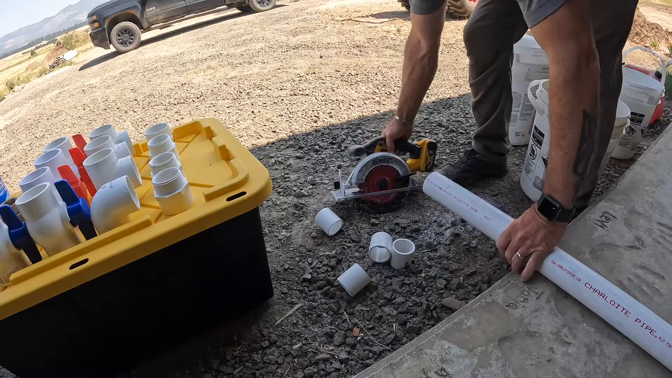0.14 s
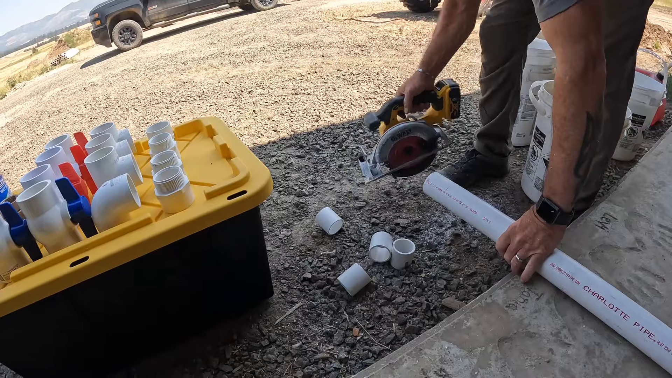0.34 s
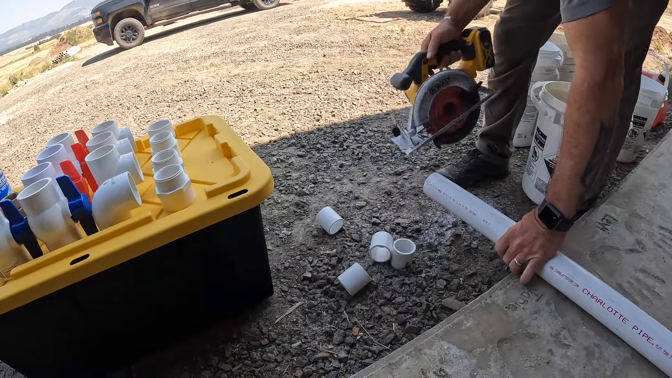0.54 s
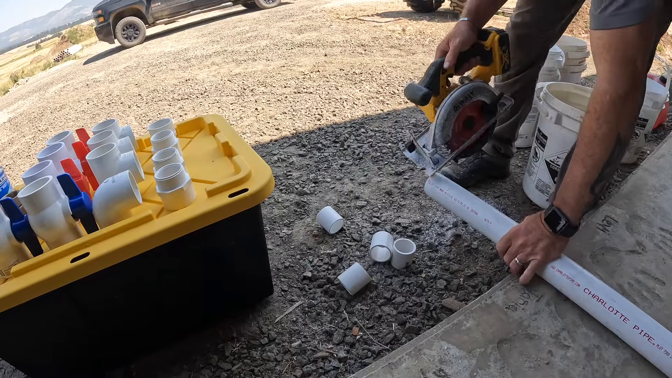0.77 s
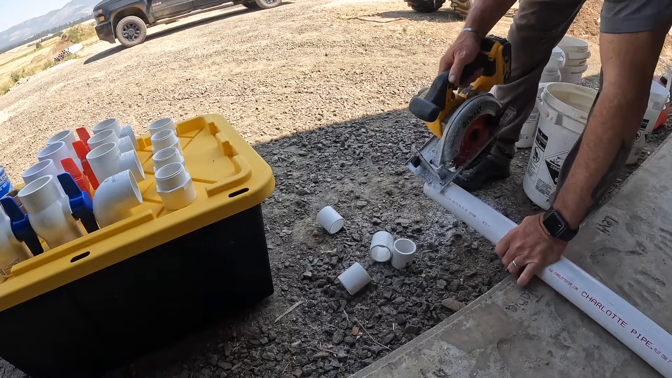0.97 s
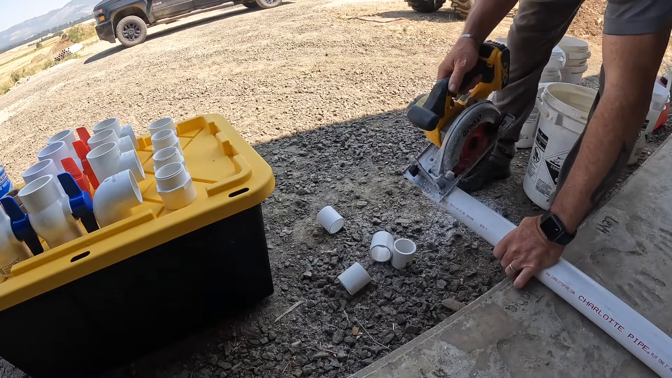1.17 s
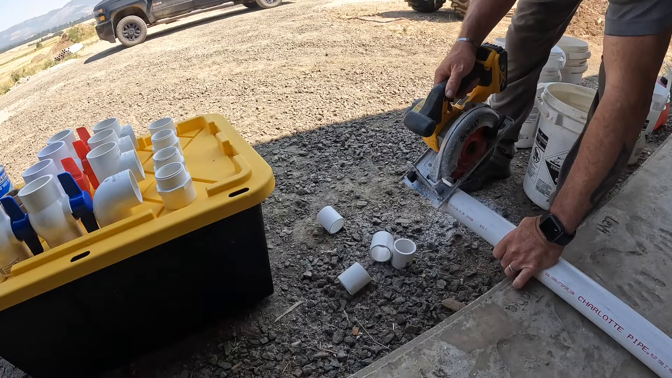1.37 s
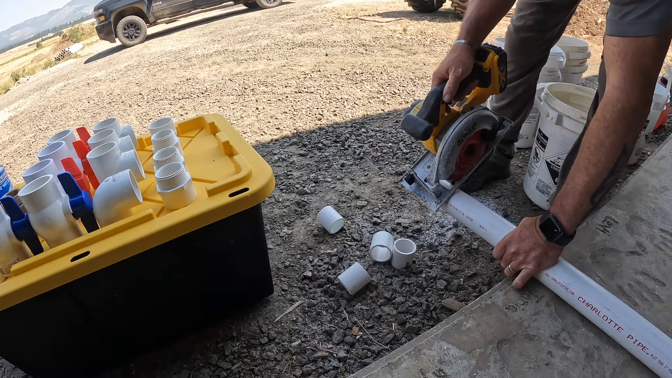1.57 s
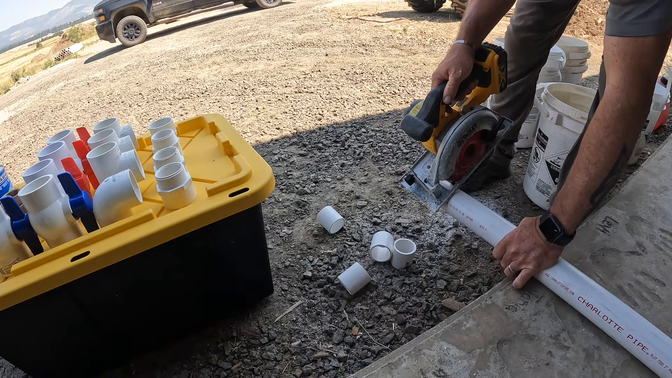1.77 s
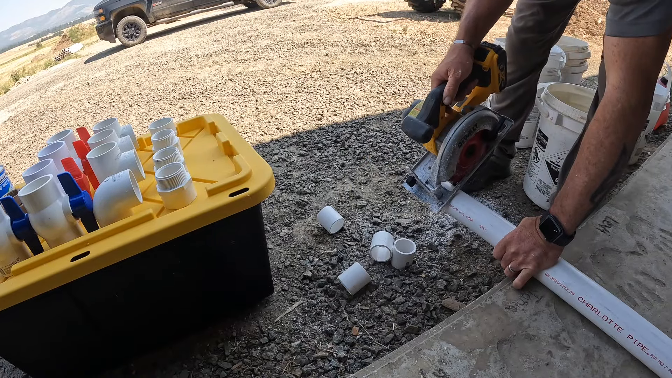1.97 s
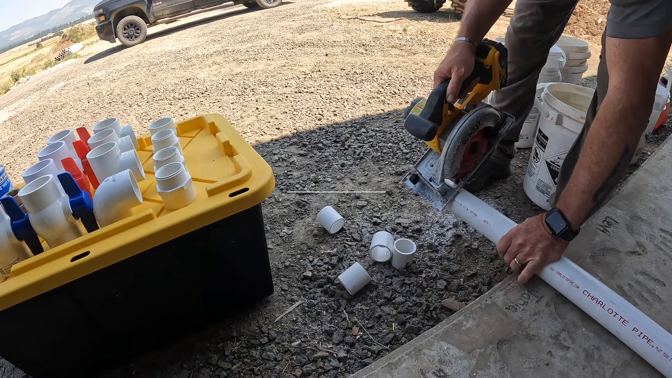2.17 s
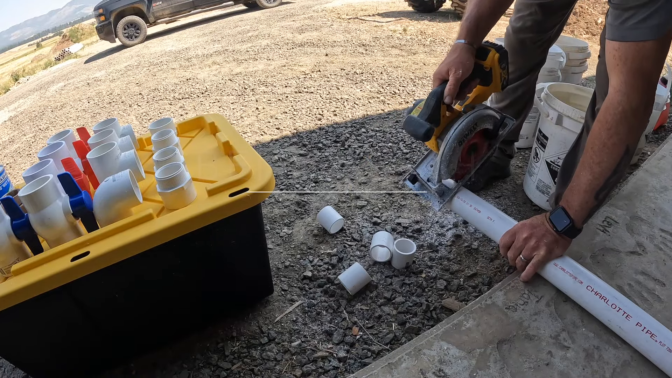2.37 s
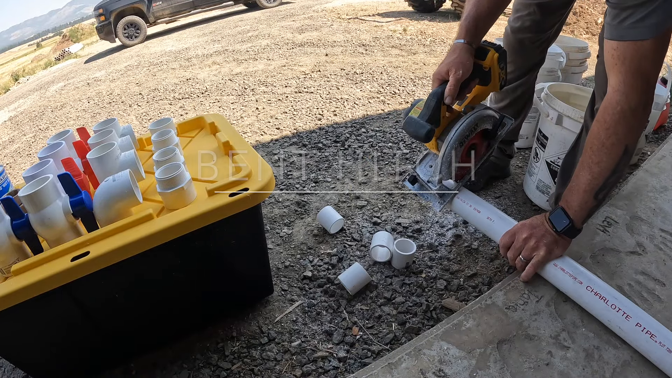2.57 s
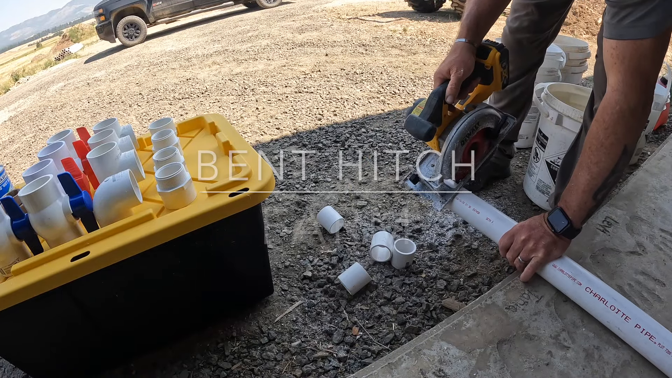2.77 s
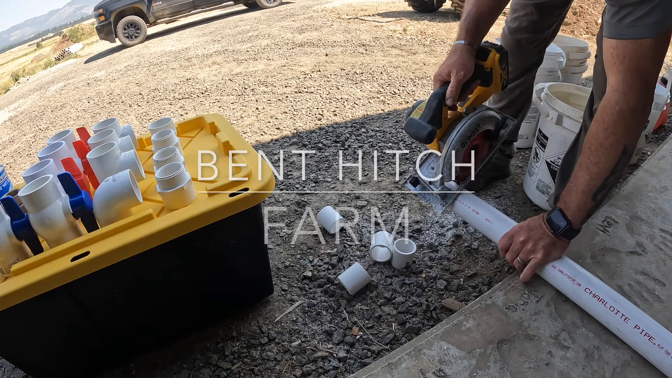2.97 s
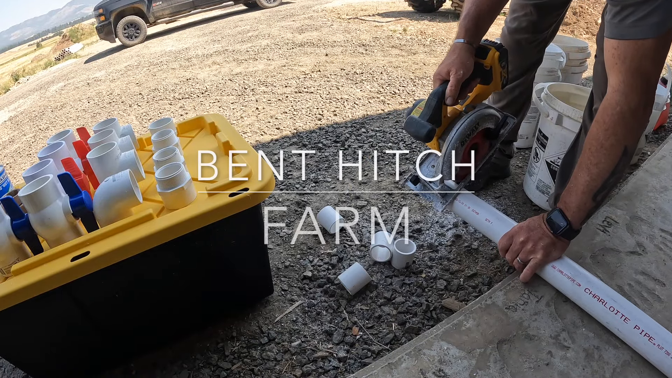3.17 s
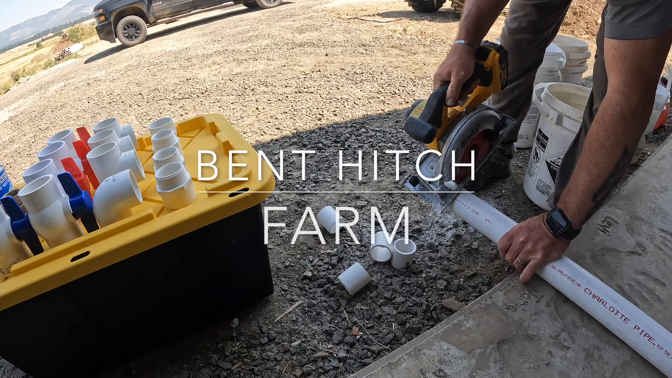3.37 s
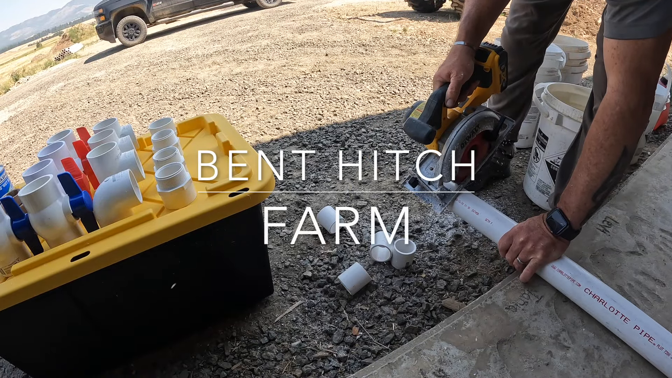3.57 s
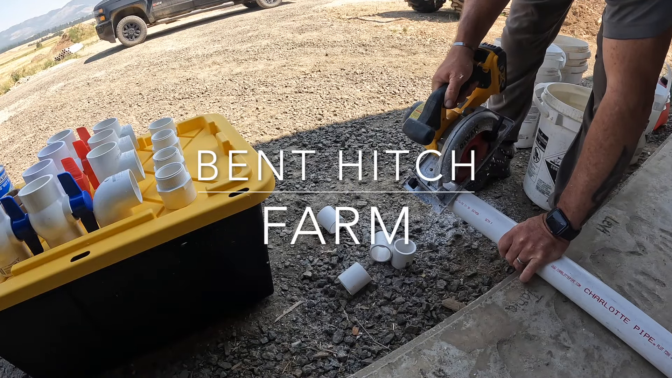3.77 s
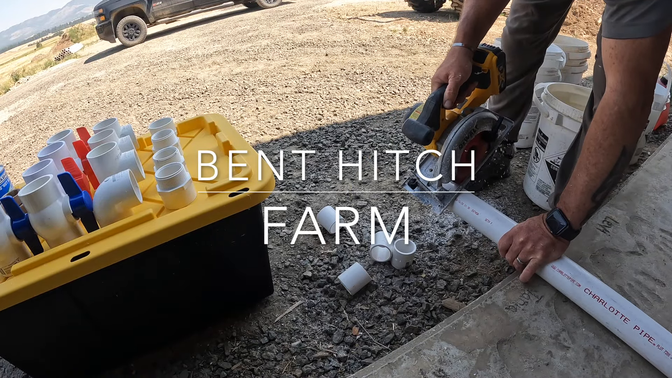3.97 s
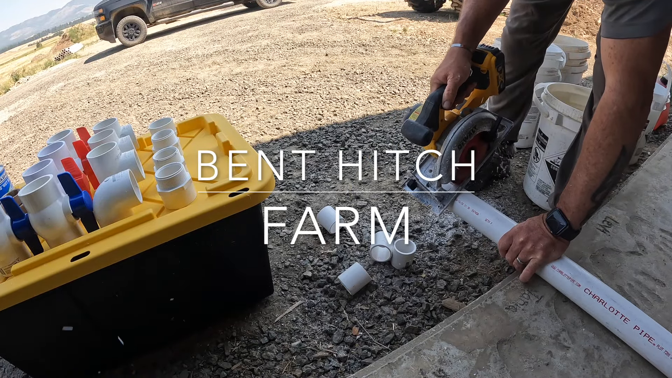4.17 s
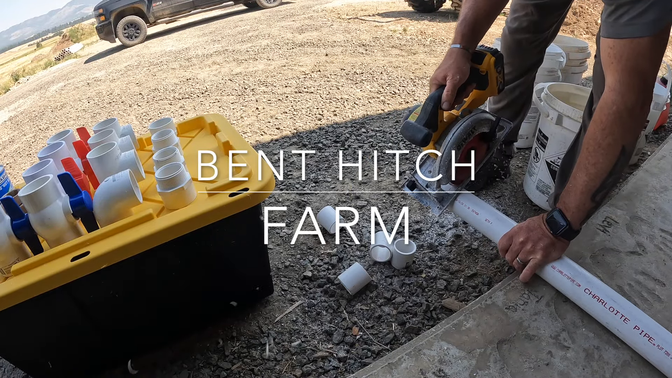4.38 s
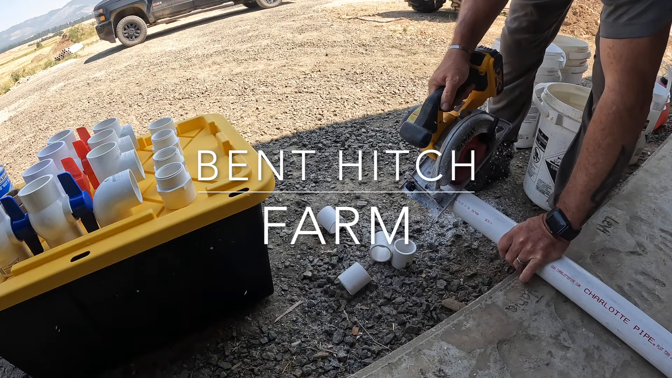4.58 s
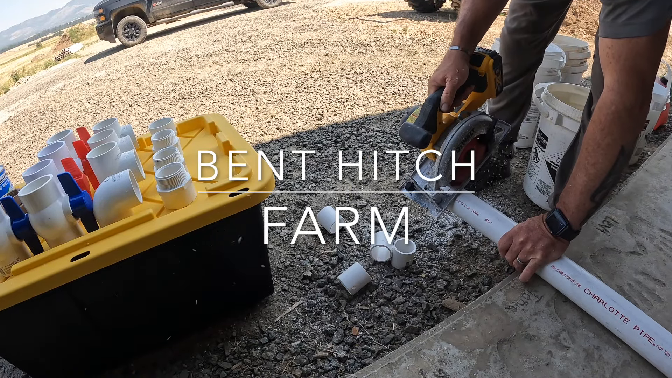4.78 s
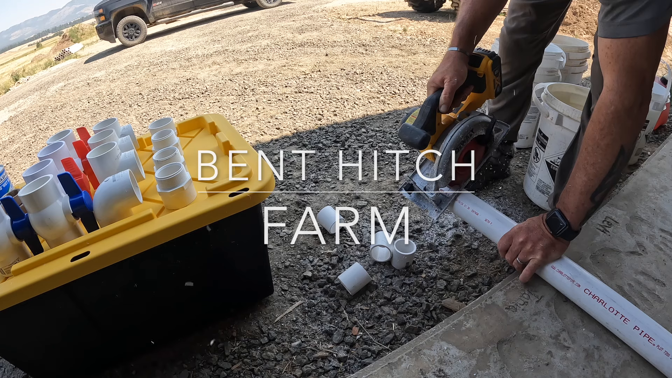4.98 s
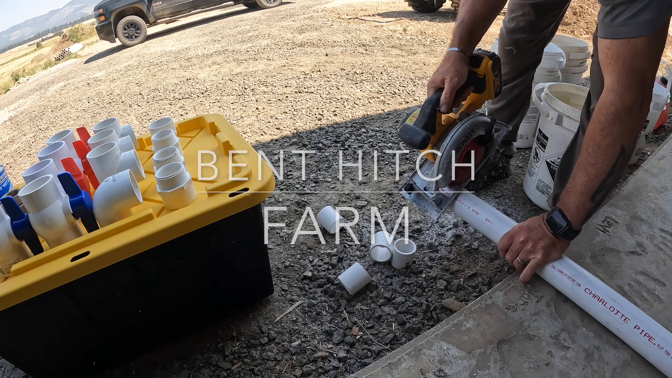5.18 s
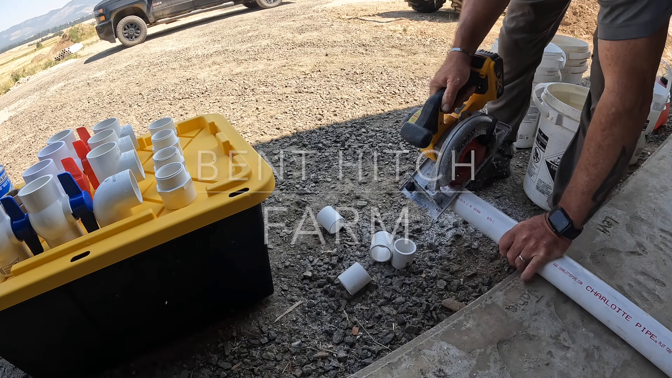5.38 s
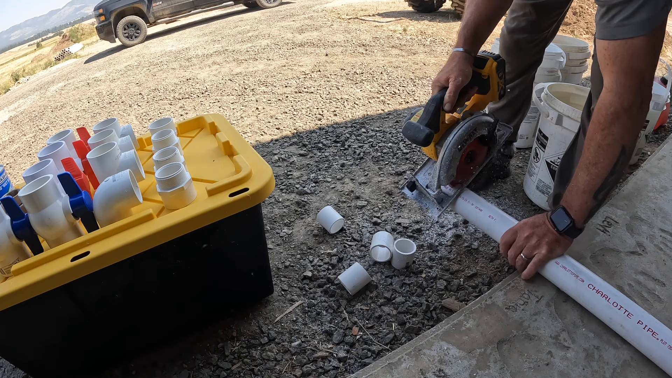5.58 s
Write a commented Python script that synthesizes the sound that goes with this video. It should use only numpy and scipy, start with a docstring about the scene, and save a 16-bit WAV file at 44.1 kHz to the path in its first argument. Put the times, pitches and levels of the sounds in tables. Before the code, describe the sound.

In a quiet yard, a cordless circular saw is lifted off gravel with scrapes, knocks and small crunches of stone. Its base plate clacks onto a plastic pipe and shifts with faint taps. The trigger clicks sharply and the motor whirs up with a gear whine. The blade then bites into the pipe, a loud, steady rasp with wavering metallic squeals. The sound is close, with only a slight echo.

```python
"""Outdoors in a quiet yard, a cordless circular saw is lifted off gravel and set on a plastic pipe.
Its base plate scrapes and knocks, stones crunch, and the latch and trigger click.
The motor runs up: the fan rushes, the rotor hums, the gears whine and the free blade rings.
Then the teeth chip at the pipe, the speed sags a little, and rubbing makes the steel blade sing."""
import sys
import numpy as np
from scipy import signal
from scipy.fft import rfft, irfft, next_fast_len
from scipy.io import wavfile
from scipy.ndimage import uniform_filter1d, map_coordinates

SR = 44100
rng = np.random.default_rng(int(sys.argv[2]) if len(sys.argv) > 2 else 0)


def unload_wav(signal):
    """Save mono or channel-first audio to the path in sys.argv[1] as 16-bit WAV at rate SR, clipped to [-1, 1]."""
    wavfile.write(
        sys.argv[1],
        SR,
        np.round(np.clip(np.atleast_2d(signal).T, -1, 1) * 32767).astype(np.int16),
    )


N = 248724
T = np.arange(N) / SR
START_S, TOUCH_S, SINK_S = 3.112, 3.685, 4.1  # motor starts, teeth touch the pipe, blade sinks in
TOUCH_RISE_S = 0.035
BLADE_TEETH, TEETH_PER_ROTOR_TURN = 28, 5.5


def amp(db):
    """Turns decibels into a gain."""
    return 10 ** (np.asarray(db) / 20)


def unit(x):
    """Scales a signal to an average (rms) size of 1."""
    return x / np.sqrt(np.mean(x ** 2) + 1e-20)


def at_level(x, db, window=176):
    """Scales a short sound so that its loudest stretch of `window` samples has this level."""
    return amp(db) * x / np.sqrt(uniform_filter1d(x ** 2, size=window).max())


def curve(rows):
    """Joins (time, value) points with straight lines."""
    return np.interp(T, *np.transpose(rows))


def ramp(start_s, length_s):
    """Rises evenly from 0 to 1."""
    return np.clip((T - start_s) / length_s, 0, 1)


def at_pitch(points, hz):
    """Looks up a (frequency, value) table, sliding between its rows."""
    f, value = np.transpose(points)
    return np.interp(np.log(hz + 1), np.log(f + 1), value)


def colour(x, points):
    """Turns each frequency up or down as a table says."""
    size = next_fast_len(len(x) + 4096)
    gain = amp(at_pitch(points, np.fft.rfftfreq(size, 1 / SR)))
    return irfft(rfft(x, size) * gain, size)[:len(x)]


def keep_side(x, hz, kind):
    """Keeps the "low" or the "high" side of a frequency."""
    return signal.sosfilt(signal.butter(2, hz, kind, fs=SR, output="sos"), x)


def band(x, hz, width_hz):
    """Keeps a band around one frequency."""
    return signal.lfilter(*signal.iirpeak(hz, hz / width_hz, SR), x)


def lift_treble(x, hz, db):
    """Turns everything above hz up by db (down, if negative)."""
    treble = keep_side(keep_side(x, hz, "high")[::-1], hz, "high")[::-1]
    return x + (amp(db) - 1) * treble


def wander(hz):
    """A smooth random wobble of size 1, changing up to about hz times a second."""
    size, step = 8192, 32
    f = np.fft.rfftfreq(size, step / SR)
    slow = irfft(rfft(rng.standard_normal(size)) / (1 + (f / hz) ** 4), size)
    return unit(np.interp(T, np.arange(size) * step / SR, slow))


def resonate(x, hz, width_hz):
    """Makes x ring at a pitch, which may move."""
    spin = np.exp(2j * np.pi * np.cumsum(hz * np.ones(N)) / SR)
    decay = np.exp(-np.pi * width_hz / SR)
    return unit((spin * signal.lfilter([1], [1, -2 * decay, decay ** 2], x / spin)).real)


def grains(per_s, spread_db):
    """Random clicks of uneven size."""
    size = amp(spread_db * np.minimum(rng.exponential(1, N), 4))
    return unit(size * rng.choice([-1, 1], N) * (rng.random(N) < per_s / SR))


def ping(t, hz, db, fade_s):
    """A tone that dies away by 60 dB in fade_s."""
    return amp(db - 60 * t / fade_s) * np.sin(2 * np.pi * hz * t)


def add(mix, start_s, sound):
    """Mixes a sound in at a given time."""
    part = mix[round(start_s * SR):][:len(sound)]
    part += sound[:len(part)]


# tone of the outdoor air (frequency [Hz], level [dB])
AIR_TONE = [(30, -33), (80, -36), (120, -15.5), (180, -5), (310, -2), (450, -6.5), (800, -15), (1400, -10),
            (4000, -24), (8300, -37.5), (14300, -40)]
def outdoor_air():
    """A faint, low hush that drifts a little in level."""
    return amp(-67.5) * unit(colour(rng.standard_normal(N), AIR_TONE)) * amp(0.43 * wander(1.1))


# how long the echo lasts under the eaves (frequency [Hz], time to fade 60 dB [s])
ECHO_FADE = [(200, 0.49), (1200, 0.47), (5000, 0.49), (8000, 0.47), (12000, 0.2)]
def yard_echo(x):
    """The wall and things standing about send back a thin tail of sound."""
    hz, t, noise = signal.stft(rng.standard_normal(SR // 2), SR, nperseg=256)
    fading = noise * amp(-60 * t / at_pitch(ECHO_FADE, hz)[:, None]) * np.minimum(t / 0.01, 1)
    tail = signal.istft(fading, SR, nperseg=256)[1]
    return amp(-11.5) * signal.fftconvolve(x, tail / np.linalg.norm(tail))[:N]


# pitches the saw's case and blade guard favour (pitch [Hz], width [Hz], level [dB])
CASE_RINGS = [(816, 76, 1.5), (1303, 71, -4.5), (1570, 180, -6.5), (2175, 120, -6), (2343, 65, -5.5),
              (2576, 57, -7), (3110, 230, -0.5), (3440, 100, -6), (4180, 170, -2.5), (4610, 110, -7.5)]
def saw_case(x):
    """Case and guard ring along with whatever shakes them."""
    return sum(amp(db) * band(x, hz, width) for hz, width, db in CASE_RINGS)


# tone of the saw rubbing or hitting something (frequency [Hz], level [dB])
CONTACT_TONE = [(50, -40), (110, -34), (180, -8.5), (400, -4), (650, -2.5), (1400, -2), (3000, -7),
                (5400, -17), (8500, -38), (11000, -42.5), (14300, -59)]
# slides of the base plate (start [s], length [s], level [dB], hiss compared with that level [dB])
PLATE_SLIDES = [(0, 0.008, -47, -4), (0.054, 0.012, -38, -5), (0.193, 0.063, -44.5, -6),
                (0.402, 0.047, -53, -4.5), (0.487, 0.12, -58, -7.5), (0.883, 0.05, -50.5, -8),
                (0.997, 0.015, -53, -1), (1.647, 0.019, -62.5, 0), (1.938, 0.053, -52.5, -7.5),
                (2.102, 0.28, -63.5, -2), (2.623, .14, -65, -6.5), (2.822, 0.065, -59.5, -2.5),
                (3.037, .03, -59.5, -3)]
def scraping():
    """The base plate drags over gravel and pipe; the grip rustles less as the saw is steadied."""
    stones = 0.5 * rng.standard_normal(N) + grains(per_s=700, spread_db=1.0)
    grit = colour(stones + 0.41 * saw_case(stones), CONTACT_TONE) * amp(1.5 * wander(35))
    grip = amp(-59 - 9.5 * T)
    scrape, hiss = grip, amp(-5.5) * grip
    rise_s, fall_s = 0.017, 0.031
    for start, length, db, hiss_db in PLATE_SLIDES:
        before, after = np.maximum(start - T, 0), np.maximum(T - start - length, 0)
        push = amp(db) * np.exp(-before / rise_s - after / fall_s)
        scrape, hiss = np.maximum(scrape, push), np.maximum(hiss, amp(hiss_db) * push)
    return scrape * unit(keep_side(grit, 2130, "low")) + hiss * unit(keep_side(grit, 3800, "high"))


# notes of the struck saw body (pitch [Hz], level [dB], time to fade 60 dB [s])
BODY_NOTES = [(334, -9, 0.087), (566, -3.5, 0.079), (1056, 1.5, 0.054), (1203, -3.5, 0.068),
              (1416, -8, 0.078), (1857, -8.5, 0.094), (3350, -21, 0.042)]
# knocks of plate, guard, stones and trigger
# (time [s], level [dB], ring pitch [Hz], bass lift [dB], treble lift [dB])
HARD_KNOCKS = [(0.009, -37.5, 1265, -13, -5), (0.063, -33.5, 1415, 4.5, -2), (0.093, -35.5, 835, 6, 3),
               (0.129, -42, 1320, 5, -1), (0.18, -32.5, 690, -2, -2), (0.197, -35.5, 660, 0, 1),
               (0.221, -28, 1400, 0, -7), (0.449, -46, 850, 5, -12), (0.499, -44.5, 1810, -3, -14),
               (0.694, -43.5, 1150, -22, -17), (0.831, -46.5, 593, 4, -4), (0.863, -43, 1310, 5, -2),
               (0.886, -45.5, 845, 7, -12), (0.906, -43, 560, 9, -11), (0.974, -35.2, 1717, -2, 2),
               (0.995, -36, 900, -3, 7), (1.023, -41.5, 1017, -5, 1), (1.575, -45, 1460, 10.5, 0),
               (1.636, -52, 1410, -4, 9), (1.964, -49, 870, 10, -4), (1.995, -43.5, 1670, 9, 4),
               (2.174, -47.5, 600, 1, 9), (2.341, -41, 1413, 12, -10), (2.747, -53, 2350, -8, 24),
               (2.793, -52.5, 600, 3, -6), (3.013, -49.5, 1835, -10, 2), (3.056, -51, 1830, -7, 1),
               (3.083, -25.5, 1240, -16, 11), (3.115, -30, 1307, -11, 4)]
def knocks():
    """Each knock is a clack, a dull rattle and the ringing of the struck part and the saw body."""
    t = np.arange(SR // 4) / SR
    out = np.zeros(N)
    for start, db, ring_hz, bass_db, treble_db in HARD_KNOCKS:
        clack = colour(rng.standard_normal(len(t)) * np.exp(-t / 0.0024), CONTACT_TONE)
        clack = lift_treble(unit(clack), 3000, treble_db)
        clack = lift_treble(clack, 6000, np.clip(treble_db, -4, 9))
        rattle = colour(rng.standard_normal(len(t)) * amp(-60 * t / 0.085), CONTACT_TONE)
        rattle = lift_treble(unit(rattle), 2300, treble_db / 2 - 5)
        ring = ping(t, ring_hz, db=0, fade_s=0.032)
        body = sum(rng.choice([-1, 1]) * ping(t, *note) for note in BODY_NOTES)
        blow = clack + amp(-3.5) * rattle + amp(-0.9) * unit(ring) + amp(-6) * unit(body)
        rise_s = np.interp(treble_db, [-15, 0, 10], [0.006, 0.004, 0.002])  # dull knocks build slower
        blow = lift_treble(blow, 690, -bass_db) * np.minimum(t / rise_s, 1) ** 1.3
        add(out, start, at_level(blow, db))
    return out


# notes of the hollow guard (pitch [Hz], level [dB], time to fade 60 dB [s])
GUARD_NOTES = [(188, -23, 0.072), (676, 2.5, 0.031), (820, -5, 0.037)]
# bumps as the saw leaves the ground (time [s], peak [dB])
GUARD_BUMPS = [(0.178, -20.5), (0.202, -34)]
def guard_bumps():
    """Soft blows set the hollow guard ringing."""
    t = np.arange(SR // 5) / SR
    ring = sum(ping(t, *note) for note in GUARD_NOTES) * np.minimum(t / 0.0069, 1) ** 1.7
    out = np.zeros(N)
    for start, db in GUARD_BUMPS:
        add(out, start, amp(db) * ring / abs(ring).max())
    return out


# metal hitting hard plastic (time [s], level [dB])
SHARP_CRACKS = [(0.9948, -26), (0.9987, -32), (1.9975, -44), (2.177, -51), (2.748, -51), (3.084, -22)]
def cracks():
    """Two hard parts meet with a bright snap about a millisecond long."""
    t = np.arange(SR // 50) / SR
    out = np.zeros(N)
    for start, db in SHARP_CRACKS:
        burst = rng.choice([-1, 1], len(t)) * np.exp(-t / 0.0007)
        snap = keep_side(burst, 1800, "high")
        snap = keep_side(keep_side(snap, 5900, "low"), 5900, "low")
        add(out, start, at_level(snap, db, window=44))
    return out


# dead thuds of the base plate (time [s], peak [dB], pitch [Hz])
PLATE_THUDS = [(0.0104, -26, 1400), (0.0932, -27, 840), (0.1297, -29.5, 900), (0.992, -24, 760),
               (1.0231, -26, 810)]
def thuds(length_cycles=2.5):
    """A blow on something held firmly does not ring on."""
    out = np.zeros(N)
    for start, db, hz in PLATE_THUDS:
        cycles = np.arange(0, length_cycles, hz / SR)
        swell = np.sin(np.pi * cycles / length_cycles) ** 2
        add(out, start, amp(db) * swell * np.sin(2 * np.pi * cycles))
    return out


# crunches of stones and grit (time [s], level [dB], pitch [Hz])
STONE_CRUNCHES = [(0.047, -41, 2480), (0.061, -39, 4400), (0.07, -33.5, 2180), (0.171, -43, 1300),
                  (0.206, -38, 2820), (0.223, -32.5, 3300), (0.248, -41, 2700), (0.285, -44, 2200),
                  (0.298, -48, 3200), (0.368, -49, 2800), (0.402, -53, 2880), (0.421, -51, 3400),
                  (0.443, -50.5, 1900), (0.52, -47, 1600), (0.565, -53, 2190), (0.582, -45, 1800),
                  (0.607, -54, 1750), (0.814, -56, 3200), (0.919, -50, 2410), (0.932, -48, 1190),
                  (1.047, -41, 1500), (1.116, -52.5, 5500), (1.252, -57, 1570), (1.926, -55, 1200),
                  (1.944, -50.5, 1000), (2.616, -60, 1300)]
# ticks of the safety latch just before the trigger (time [s], level [dB], pitch [Hz])
LATCH_TICKS = [(3.068, -45, 4200), (3.077, -39, 3500)]
def stones_and_latch():
    """Small, hard things give brief, dry snaps."""
    t = np.arange(SR // 20) / SR
    out = np.zeros(N)
    for start, db, hz in STONE_CRUNCHES + LATCH_TICKS:
        burst = rng.standard_normal(len(t)) * np.exp(-t / 0.0033) * np.minimum(t / 0.001, 1)
        snap = keep_side(band(burst, hz, width_hz=hz / 2), 1.15 * hz, "low")
        add(out, start, at_level(keep_side(snap, 4800, "low"), db))
    return out


RUN_UP_HZ_PER_S, EASE_OFF_HZ, TOP_SPEED_HZ, SETTLE_S = 1500, 168, 372, 0.182
# how much the cut slows the motor (time [s], speed lost [turns per s])
SPEED_LOSS = [(3.92, 0), (4.1, 9), (4.3, 14), (4.45, 15), (4.7, 13), (5.0, 13), (5.2, 10), (5.4, 7.5),
              (5.64, 8)]
def rotor():
    """Turns a second and effort (0-1): the motor speeds up flat out, then eases towards top speed."""
    easing_s = np.maximum(T - START_S - EASE_OFF_HZ / RUN_UP_HZ_PER_S, 0)
    effort = np.exp(-easing_s / SETTLE_S)
    run_up = np.clip(RUN_UP_HZ_PER_S * (T - START_S), 1, EASE_OFF_HZ)
    speed = run_up + (TOP_SPEED_HZ - EASE_OFF_HZ) * (1 - effort)
    return speed - curve(SPEED_LOSS), effort


def fade_in_cut(drop_db, fade_db_per_s):
    """Lowers a motor sound from the moment the teeth touch the pipe, then keeps fading it."""
    return amp(-drop_db * ramp(TOUCH_S, 0.094) - fade_db_per_s * np.maximum(T - TOUCH_S, 0))


# tone of the fan and rattling gears (frequency [Hz], level [dB])
FAN_TONE = [(60, -74), (110, -45), (190, -20), (420, -18.5), (600, -16), (780, -8), (1400, -4),
            (2700, -0.5), (3700, -6.5), (4400, -6), (6000, -9.5), (8000, -21), (11000, -29.5), (14300, -48)]
def fan_rush(speed, turns):
    """Fan air and gear rattle brighten with speed and pulse with each turn of rotor and blade."""
    rattle = rng.standard_normal(N) + 0.35 * grains(per_s=1800, spread_db=1.5)
    rush = unit(colour(rattle + 1.3 * saw_case(rattle), FAN_TONE))
    slowness = 1 - np.minimum(speed / 300, 1)
    rush = lift_treble(rush, 1420, -14 * slowness) * amp(7.1 * slowness)
    rotor_pulse = 1 + 0.25 * np.cos(2 * np.pi * turns)
    blade_pulse = 1 + 0.089 * np.cos(2 * np.pi * turns * TEETH_PER_ROTOR_TURN / BLADE_TEETH)
    level = amp(-25.5 + 0.5 * wander(40)) * fade_in_cut(drop_db=5.64, fade_db_per_s=3.2)
    return level * rush * rotor_pulse * blade_pulse


def rotor_hum(speed, turns):
    """The rotor hums one wave per turn, far more quietly at low speed."""
    octaves_slow = np.maximum(np.log2(287 / speed), 0)
    level = amp(-43 - 48 * octaves_slow + 0.69 * wander(24))
    return level * np.sqrt(2) * np.sin(2 * np.pi * turns) * fade_in_cut(drop_db=10.7, fade_db_per_s=6.4)


# gear tones, loudest where the case sends them out best
# (waves per rotor turn [count], level [dB], best pitch [Hz], spread around it [octaves])
GEAR_TONES = [(4, -12, 800, .15), (9, -1.5, 1350, 0.88), (13, -4, 3150, 0.13), (18, -3, 4380, .1),
              (27, -6.5, 6350, 0.14)]
def gear_whine(speed, turns, effort):
    """The gears whine, louder when pressed together; each tone flares as it passes a ring of the case."""
    slack = 0.006 * wander(160)
    tones = np.zeros(N)
    for per_turn, db, best_hz, octaves in GEAR_TONES:
        swell = 0.04 + np.exp(-0.5 * (np.log2(per_turn * speed / best_hz) / octaves) ** 2)
        tones += swell * amp(db + 2.2 * wander(170)) * np.sin(2 * np.pi * per_turn * (turns + slack))
    whine = keep_side(saw_case(tones) + amp(-7.5) * tones, 650, "high")
    pressure = np.clip(effort, 0.08, 0.38) / 0.38  # from just idling to fully pressed together
    return amp(-23.5) * whine * pressure ** 0.88 * fade_in_cut(drop_db=2, fade_db_per_s=2)


# notes of the blade spinning in the air (pitch [Hz], width [Hz], level [dB])
FREE_BLADE_NOTES = [(2356, 47, -38.5), (2900, 58, -43), (3434, 75, -41), (4200, 80, -41.5),
                    (4640, 100, -49), (5920, 70, -40.5)]
def free_blade(speed):
    """The shaken blade rings while it spins free, until the pipe damps it."""
    rings = sum(amp(db + 1.2 * wander(45)) * resonate(rng.standard_normal(N), hz, width)
                for hz, width, db in FREE_BLADE_NOTES)
    return rings * np.minimum(speed / EASE_OFF_HZ, 1) * (T > START_S) * (1 - ramp(TOUCH_S, 0.08))


# notes of the rubbed blade (pitch with no load [Hz], level [dB], shift at full load [Hz])
SINGING_NOTES = [(1366, -37, -32.5), (1423, -41.5, -10), (1489, -34, 29), (1516, -40.5, 20)]
def blade_singing(load, sunk):
    """Rubbing in the slot keeps close notes of the blade going; the load bends their pitch."""
    rough = 0.15 + 0.05 * sunk  # the tone frays as the blade sinks in
    out = np.zeros(N)
    for free_hz, db, shift_hz in SINGING_NOTES:
        hz = free_hz + shift_hz * load + 4 * wander(4.02)
        cycles = np.cumsum(hz + 3 * wander(24.4)) / SR
        clean = np.sqrt(2) * np.sin(2 * np.pi * cycles) * amp(1.8 * wander(25))
        fuzz = resonate(rng.standard_normal(N), hz, width_hz=45)
        out += amp(db) * (clean * (1 - rough) + fuzz * rough) / np.hypot(rough, 1 - rough)
    return out * amp(sunk - 1)  # 1 dB softer while the cut is shallow


# squeals of the blade (middle time [s], length [s], pitch [Hz], level [dB], glide [Hz per s])
BLADE_SQUEALS = [(3.751, 0.14, 1346, -26, 80.5), (3.781, 0.18, 1505, -29.5, 29.5),
                 (3.899, .22, 1506, -24.5, 100), (4.07, 0.17, 1503, -28.5, 40),
                 (4.18, 0.2, 1345, -28.5, -130), (4.19, 0.31, 1417, -32.5, -100),
                 (4.482, .2, 1540, -35, -59.5), (4.607, 0.12, 1522, -31, -1.5), (4.68, 0.21, 1346, -34, 0),
                 (4.797, 0.34, 1519, -35, -0.5), (5.08, 0.38, 1417, -35, 35), (5.14, 0.15, 1349, -35, 30.5),
                 (5.357, 0.1, 1512, -28, 0), (5.57, .26, 1503, -30.5, 0), (3.82, 0.14, 3150, -36, 0),
                 (4.277, 0.27, 1955, -38, 0.5), (4.33, .2, 2805, -37, 0), (4.46, .24, 3145, -33, 0.5),
                 (4.77, .3, 3795, -40, 0), (4.98, .22, 1975, -39, 0)]
def blade_squeals():
    """Now and then the rubbing swells one note of the blade into a clean squeal."""
    out = np.zeros(N)
    for middle, length, hz, db, glide in BLADE_SQUEALS:
        swell = np.sin(np.pi * ramp(middle - length / 2, length))
        cycles = np.cumsum(hz + glide * (T - middle) + 3 * wander(21.1)) / SR
        out += amp(db) * swell * np.sqrt(2) * np.sin(2 * np.pi * cycles)
    return out * ramp(TOUCH_S + TOUCH_RISE_S / 2, TOUCH_RISE_S)


def tooth_blows(teeth, blade_turns, sunk):
    """Each tooth tears out a chip of its own size, and partly repeats its blow on the next turns."""
    bite = amp(1.1 * wander(115) + 0.5 * wander(23))
    bite *= 1 + 0.095 * np.cos(2 * np.pi * teeth / BLADE_TEETH)
    tearing = rng.standard_normal(N) * (0.56 + np.exp(-(teeth % 1) / 0.32))
    fresh = bite * (tearing + 0.3 * grains(per_s=1500, spread_db=0.5))
    repeat_share = 0.45 - 0.15 * sunk
    blows = fresh.copy()
    for lap in range(1, 4):
        earlier = np.interp(blade_turns - lap, blade_turns, np.arange(N))
        blows += repeat_share ** lap * map_coordinates(fresh, [earlier])
    return unit(blows)


# tone of the chipping plastic (frequency [Hz], level [dB])
CHIP_TONE = [(100, -37), (280, -23), (420, -34), (600, -28), (850, -21), (1100, -13), (1500, 1.5),
             (2050, -12.5), (3050, 1.5), (3600, -2.5), (4700, -1), (6600, -9), (8400, -23), (11000, -15.5),
             (13800, -32.5)]
# pitches that blade and pipe send out badly (pitch [Hz], width [Hz], depth [0-1])
WEAK_PITCHES = [(1900, 81, 0.35), (2050, 110, .5), (2690, 84, .5), (3680, 95, .6), (4080, 91, .5),
                (5490, 110, .4)]
# notes of the struck blade and pipe (pitch [Hz], width [Hz], level [dB])
CUT_NOTES = [(811, 56, -14), (1589, 35, -11), (1730, 24, -6), (2205, 40, -10.5), (2307, 35, -7.5),
             (2467, 18, -11), (2630, 18, -12.5), (2797, 26, -4.5), (2890, 65, -5), (3022, 54, -3.5),
             (3156, 30, -2.5), (3285, 50, -7.5), (3370, 20, -5.5), (3578, 19, -12), (3795, 40, -5),
             (4210, 58, -10.5), (4356, 30, -5.5), (4655, 50, -10), (4790, 64, -9), (4940, 81, -12),
             (5370, 50, -9), (7010, 18, -14.5)]
def cutting(turns, load, sunk):
    """The teeth chip the pipe and set pipe and blade ringing; the rasp brightens as the blade sinks."""
    steady_teeth = turns * TEETH_PER_ROTOR_TURN
    teeth = steady_teeth + 0.14 * wander(45)  # teeth gone by so far, a little uneven
    blows = tooth_blows(teeth, steady_teeth / BLADE_TEETH, sunk)
    chips = colour(blows, CHIP_TONE)
    for hz, width, depth in WEAK_PITCHES:
        chips = chips - depth * band(chips, hz, width)
    rings = sum(amp(db + 1.2 * wander(10)) * resonate(blows, hz, width) for hz, width, db in CUT_NOTES)
    tooth_tone = np.sin(2 * np.pi * teeth) * amp(3.2 * wander(20))
    rasp = amp(-2) * unit(chips) + amp(-7.04) * unit(rings) + amp(-13.04) * tooth_tone
    rasp = lift_treble(rasp, 4000, -4 + 4.5 * sunk)
    return amp(-23.7 + 0.6 * wander(11)) * load * rasp  # surges with the uneven push


# how alike left and right sound (frequency [Hz], likeness [0-1])
LIKENESS = [(30, 0.9), (100, 1), (400, 1), (1000, 1), (10300, 1), (11600, 0.36)]
def stereo(x):
    """Left and right are nearly the same, except the highest treble, which comes by scattered paths."""
    same = at_pitch(LIKENESS, np.fft.rfftfreq(N, 1 / SR))
    t = np.arange(SR // 10) / SR
    paths = rng.standard_normal(len(t)) * np.exp(-t / 0.025)
    scattered = signal.fftconvolve(x, paths / np.linalg.norm(paths))[:N]
    side = irfft(rfft(scattered) * np.sqrt((1 - same) / (1 + same)), N)
    return np.array([x + side, x - side])


# how hard the blade is pushed into the pipe, 0 being full load (time [s], load [dB])
PUSH = [(3.72, -.5), (3.9, -6.5), (4.04, -2), (4.11, -5.5), (4.21, -4.5), (4.33, -1.8), (4.46, -1),
        (4.62, -2), (5.28, -2.5), (5.45, -1.5), (5.64, -1)]
def scene():
    """The saw is handled, started and pushed through the pipe, over quiet outdoor air."""
    load = amp(curve(PUSH)) * ramp(TOUCH_S, TOUCH_RISE_S)
    sunk = ramp(SINK_S, 0.38)
    rubbing = ramp(TOUCH_S + TOUCH_RISE_S / 2, TOUCH_RISE_S)
    speed, effort = rotor()
    turns = np.cumsum(speed) / SR
    hits = knocks() + guard_bumps() + cracks() + thuds() + stones_and_latch()
    handling = keep_side(hits, 145, "high") + scraping()  # the knocks and snaps carry little deep bass
    soft_start = amp(-18.5 * (1 - ramp(START_S, 0.05))) * (T > START_S)
    motor = fan_rush(speed, turns) + rotor_hum(speed, turns) + gear_whine(speed, turns, effort)
    saw = soft_start * motor + free_blade(speed) + cutting(turns, load, sunk)
    saw += rubbing * blade_singing(load, sunk) + blade_squeals()
    return stereo(outdoor_air() + yard_echo(handling) + handling + saw)


def record(dry):
    """Rounds off loud peaks, then cuts the deep bass, one narrow treble band and the very top."""
    ceiling, notch_hz, top_hz = 0.28, 9060, 14150
    x = dry / (1 + (dry / ceiling) ** 8) ** (1 / 8)
    x = keep_side(x, 66, "high")
    b, a = signal.iirnotch(notch_hz, 18, SR)
    notched = signal.lfilter(b, a, signal.lfilter(b, a, x))
    top_cut = signal.firwin(511, top_hz, window=("kaiser", 9), fs=SR)
    return signal.oaconvolve(notched, top_cut[None], "same")


dry = scene()
out = record(dry)
unload_wav(out)
```